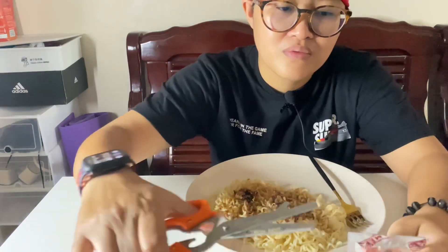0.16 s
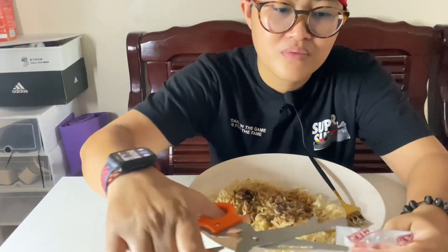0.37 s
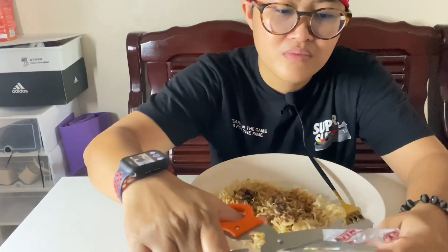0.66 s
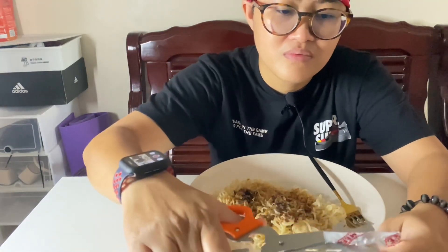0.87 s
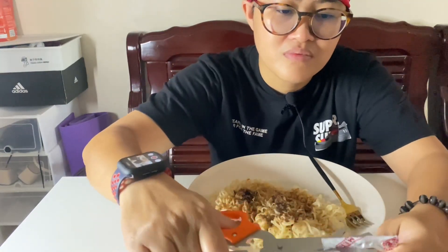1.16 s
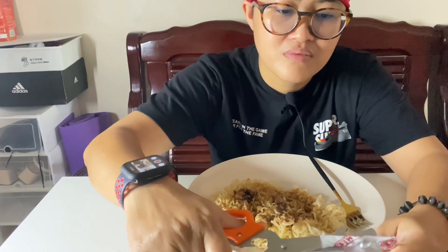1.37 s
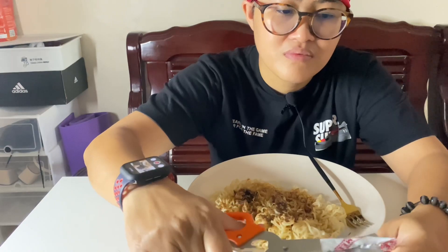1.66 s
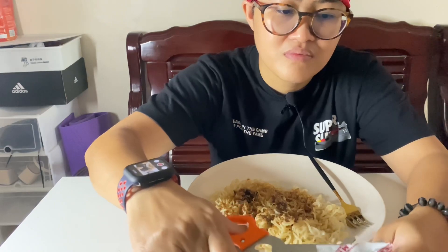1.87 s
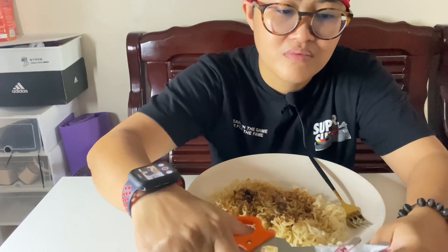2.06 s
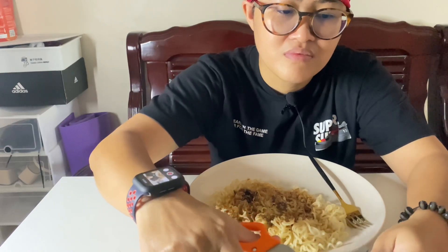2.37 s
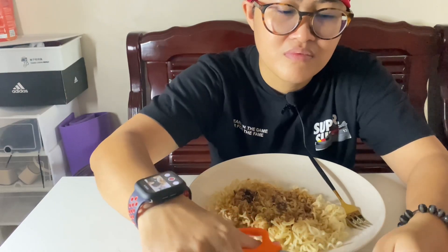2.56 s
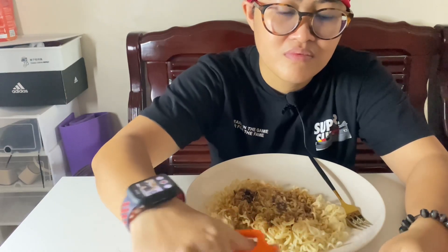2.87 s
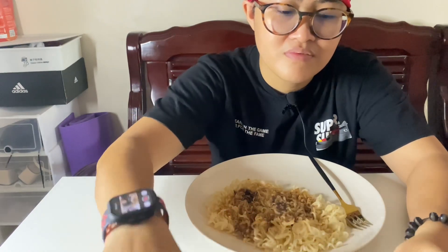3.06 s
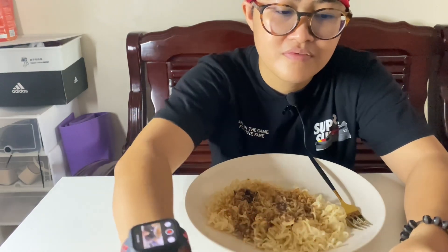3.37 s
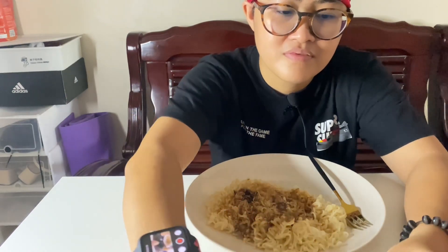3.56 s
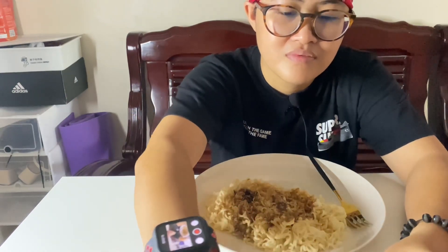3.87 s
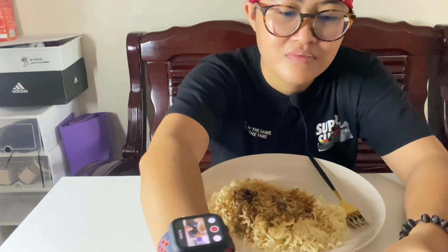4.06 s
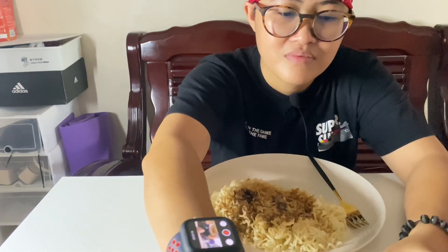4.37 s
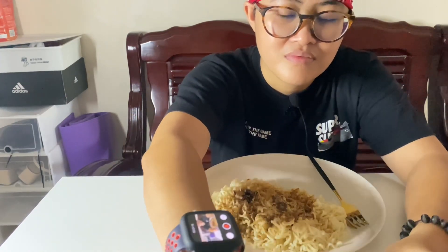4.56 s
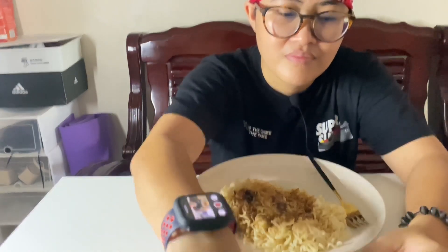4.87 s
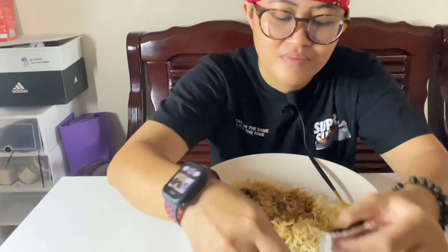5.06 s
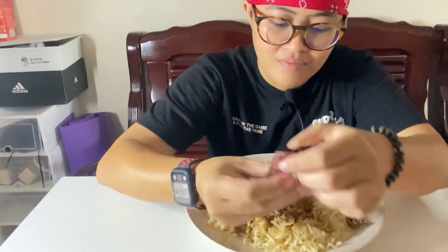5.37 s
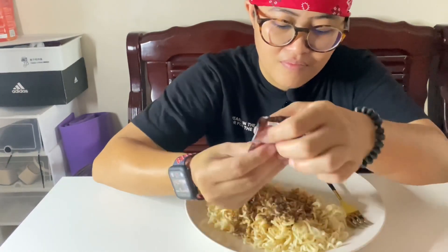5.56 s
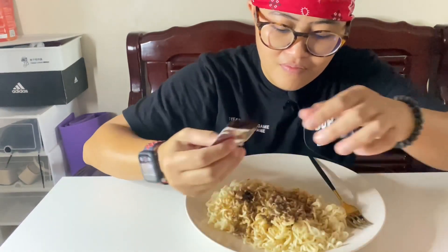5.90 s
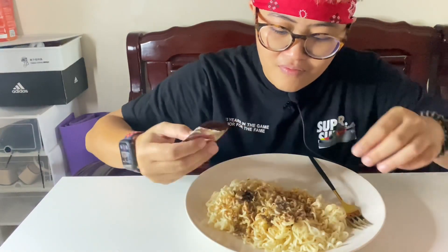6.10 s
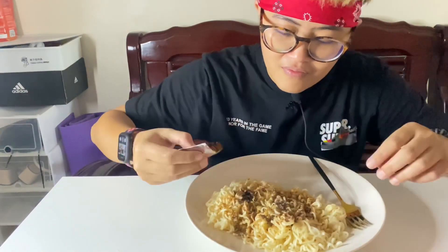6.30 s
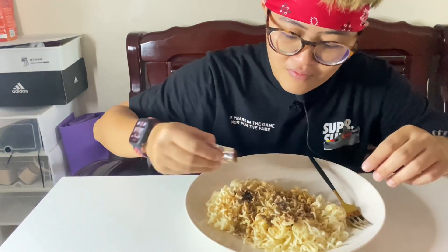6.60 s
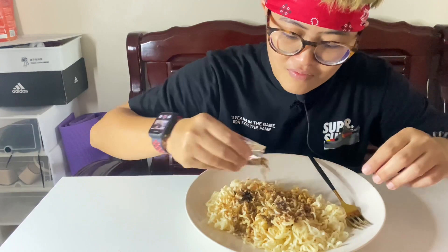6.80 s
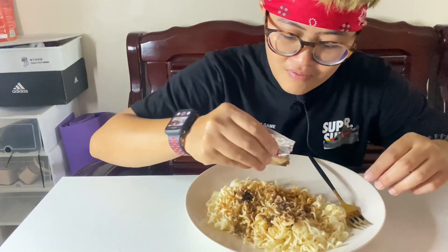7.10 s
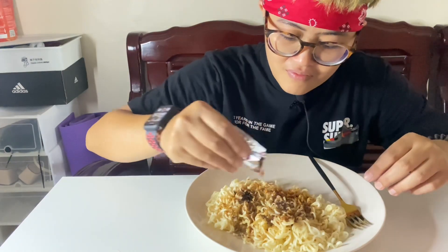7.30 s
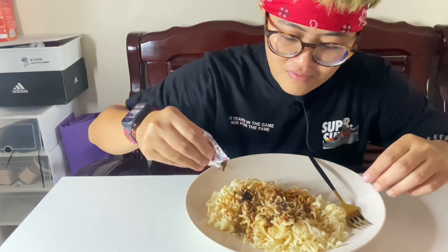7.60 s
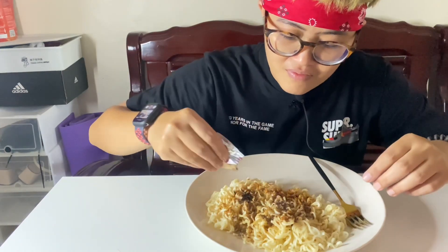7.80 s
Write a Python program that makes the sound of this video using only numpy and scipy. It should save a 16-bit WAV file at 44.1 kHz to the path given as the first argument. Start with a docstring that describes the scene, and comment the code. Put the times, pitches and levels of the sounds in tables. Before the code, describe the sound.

Close up in a small hard room, thin plastic film crackles faintly, then snaps sharply as scissors cut a sachet. The scissors are set down and slide along a table with short scrapes, then drop with a loud double-bouncing clatter. Finally the sachet is pinched open with crisp crinkles and shaken, tiny bits ticking onto a plate over low hum and soft hiss.

```python
"""A faint crackle of film comes first, as scissors snip open a small plastic sachet; they are then slid over a
table, with a few ticks, and dropped on it; last, the sachet is pinched open and crunchy bits are shaken onto a plate.
Film sounds are impulses of buckling passed through resonances; the table is a sum of decaying modes, struck
or rubbed. A small hard room adds diffuse echoes over a low hum, rumble and hiss.
The close clip-on microphone is keenest near 5 kHz."""
import sys
import numpy as np
from scipy import signal
from scipy.fft import rfft, irfft
from scipy.io import wavfile
from scipy.ndimage import uniform_filter1d

SR = 44100
rng = np.random.default_rng(int(sys.argv[2]) if len(sys.argv) > 2 else 0)


def generate_wav(signal):
    """Clip the signal to [-1, 1] and save it as 16-bit WAV at the path in sys.argv[1]."""
    frames = np.transpose(np.atleast_2d(signal))
    scaled = np.clip(frames, -1, 1) * 32767
    pcm = np.round(scaled).astype(np.int16)
    wavfile.write(sys.argv[1], SR, pcm)


N = 350330
TIME = np.arange(N) / SR  # s

# loudest snaps: film being cut, pinched and shaken, and a few ticks while the scissors are slid,
# the first likely their blades closing: (time [s], relative tick peak [dB], relative pop level [dB])
SNAPS = [(0.0276, -24.5, -48), (0.131, -29.5, -52), (0.512, -30, -57), (0.597, -28, -69),
         (0.6928, -31.5, -54), (1.0276, -18.5, -44), (1.0715, -19, -50), (1.0944, -20, -44),
         (1.2898, -20, -51), (1.3639, -17.5, -55), (1.4214, -22.5, -55), (1.477, -2, -35),
         (1.5364, -10, -53), (1.5648, -21, -49), (1.7056, -34, -35.5), (1.8212, -21.5, -45.5),
         (1.8452, -16, -42), (2.1962, -17.5, -38), (2.378, -25, -39.5), (2.5666, -25, -44.5),
         (2.6798, -6.5, -29), (2.6869, -14.5, -35), (2.7324, -23, -42), (3.9172, -17, -41.5),
         (3.9669, -26, -33), (4.1705, -27, -43.5), (5.492, -26.5, -43), (5.5445, -14, -35.5),
         (5.6725, -21, -30), (6.348, -12, -35), (6.4494, -27, -46), (6.5136, -18, -36), (6.9594, -20, -43),
         (7.199, -27.5, -50.5), (7.3063, -20, -41), (7.519, -22, -42), (7.5451, -12, -40),
         (7.5488, -12, -36.5), (7.669, -20, -52), (7.6984, -17, -58), (7.7404, -21.5, -41),
         (7.8585, -22.5, -49)]
# flurries of small crackles, mostly from a squeeze, cut or shake: (time [s], length [s], relative level [dB])
FLURRIES = [(0, 0.028, -49), (0.127, 0.078, -52.5), (0.487, 0.023, -48.5), (.655, 0.16, -62.5),
            (0.998, 0.17, -49), (1.213, 0.18, -53.5), (1.418, 0.033, -44.5), (1.493, .085, -42),
            (1.628, 0.2, -51), (1.803, 0.16, -48), (1.997, .13, -44.5), (2.188, 0.074, -47),
            (2.338, .12, -46), (2.483, 0.11, -49), (2.626, 0.052, -41.5), (2.791, .08, -45.5),
            (3.02, .26, -58.5), (3.931, .09, -52.5), (5.234, .11, -50.5), (5.375, 0.16, -52),
            (5.529, 0.12, -48.5), (5.641, .1, -42.5), (5.72, 0.27, -53), (5.945, 0.072, -44),
            (6.11, .14, -46), (6.25, 0.091, -54), (6.44, 0.22, -52.5), (6.677, 0.48, -49),
            (7.45, 0.34, -50.5)]
# colour of one buckle in the film: (frequency [Hz], gain [dB])
FILM_COLOUR = [(800, -60), (2200, -28), (3200, -5.5), (4300, -2), (5300, 11), (6100, -4), (7000, -13),
               (9000, -26.5), (12000, -45), (16000, -44.5)]
# colour of the stretched sachet behind the buckle: (frequency [Hz], gain [dB])
SACHET_COLOUR = [(200, -27), (600, 5.5), (1200, 5), (1900, 2), (2800, 6), (4000, 1), (7000, -41.5)]
# sizes of crease in the crackle: (pitch ratio [1], level [dB])
CREASE_SIZES = [(1.093, 0), (1, 0), (0.865, 0), (1.63, -24)]
# the lips of the cut sachet peel apart: (time [s], length [s], level [dB])
PEELS = [(5.448, 0.59, -55), (5.669, 0.015, -35)]
# lone ticks while the sachet rests, is cut, rests and is shaken: (time [s], level [dB])
STRAY_LEVELS = [(.9, -68), (1.05, -57), (2.9, -57), (3.3, -68), (5.1, -68), (5.4, -56)]
# scissors set down on the table, nudged, then dropped with bounces: (time [s], force [dB])
KNOCKS = [(3.6323, -19.5), (3.6631, -30.5), (3.8432, -23), (4.507, -33), (4.6367, .5), (4.663, -12.5),
          (4.8633, -2), (4.876, -5.5), (4.898, -13), (4.9025, -13), (4.9405, -21), (4.954, -15),
          (4.971, -17), (5.033, -32)]
# pushes of the scissors along the table: (time [s], length [s], relative level [dB])
SLIDES = [(3.647, 0.049, -40), (3.747, .14, -37.5), (4.102, 0.11, -41), (4.259, 0.14, -35.5),
          (4.346, 0.27, -49), (4.607, .037, -44.5)]
# modes of the table top with the scissors on it:
# (frequency [Hz], width before the damping factor [Hz], gain when struck [dB], gain when rubbed [dB])
TABLE_MODES = [(169, 81, -4, -14), (430, 25, -4, -8.5), (578, 120, -34, 7), (700, 36, 5.5, -22),
               (933, 170, 7, -29.5), (1009, 69, 3, 7), (1085, 59, 9, -6), (1322, 170, 3.5, -5),
               (1620, 174, 3.5, -8.5), (1884, 82, 8.5, -8), (2220, 150, -3.5, -31), (2440, 150, 3.5, -6),
               (2620, 43, -9, -7), (3460, 86, 4, -15.5), (4090, 370, -17.5, -13.5), (4420, 370, -6, -24.5),
               (4990, 155, -25.5, -10.5), (5010, 190, -8, -16.5)]
# reverberation: (frequency [Hz], time to fall by 60 dB [s])
REVERB_TIMES = [(300, 1), (1200, 0.39), (3000, 0.64), (5500, 0.73), (10000, 0.31)]
# spectrum of room rumble and microphone hiss: (frequency [Hz], relative density [dB])
AIR_COLOUR = [(5, -3), (13, 12), (27, -16.5), (60, -5.5), (95, -28), (150, -25), (280, -21.5), (600, -29.5),
              (1100, -35.5), (2000, -44.5), (3500, -50), (5300, -51), (7500, -63), (15000, -70.5)]

AIR_DB = -50.5  # level of the air noise, set by its 100-1000 Hz band before flutter
SACHET_BODY_DB = -7  # trim of the sachet body's level in each flurry
SWELL_SHARE = 0.36  # part of a hand move spent swelling; the rest is release
THUD_SLOPE, CLACK_SLOPE = 0.77, 1.2  # dB per dB of force: a harder blow is brighter
TOP_HZ = 16200  # upper edge of the pass band


def snaps(edge_db=-1.0, body_db=-4.5, crease_ratio=1.019, crease_scatter=0.046, own=0.89, scatter=0.31):
    """Impulsive excitation, mostly film buckling: a sharp tick, and a duller pop of randomly shifted pitch."""
    out, t = np.zeros(N), np.arange(2048) / SR
    tension = rng.uniform(-0.98, 1, (len(SNAPS), 2))
    for (s, tick_db, pop_db), (crease, stretch) in zip(SNAPS, tension):
        flip = contact(t, decay_s=.0006, rough=.9)
        # each snap's own pitch sits beside the fixed treble peak of the microphone
        own_colour = response(FILM_COLOUR, crease_ratio * np.exp(crease_scatter * crease))
        tick = through(flip, response(FILM_COLOUR) + own * own_colour)
        push = contact(t, decay_s=0.0019, rough=2.7)
        pop = through(push, response(SACHET_COLOUR, np.exp(scatter * stretch)))
        snap = at_peak(tick, tick_db + edge_db) + at_level(pop, pop_db + body_db)
        add(out, s + .0006, snap)
    return out


def crackle(edge_db=-1.5):
    """Crackling noise: countless creases of four sizes yield as the film flexes and the bits shift inside it."""
    clicks = [grains(rate=430, spread_db=4.3, bunch_db=3) for _ in CREASE_SIZES]
    edge = np.zeros(N)
    for click, (pitch, db) in zip(clicks, CREASE_SIZES):
        edge += undb(db) * through(click, response(FILM_COLOUR, pitch))
    body = through(sum(clicks), response(SACHET_COLOUR))
    return strokes(edge, FLURRIES, edge_db) + strokes(body, FLURRIES, SACHET_BODY_DB)


def peel(lo_hz=2500, hi_hz=3500):
    """Jerky peeling: the film unsticks in quick releases that ring the opening mouth of the sachet."""
    rasp = band(grains(rate=500, spread_db=4, bunch_db=3), lo_hz, hi_hz)
    return strokes(rasp, PEELS)


def stray_ticks():
    """Random buckling: lone creases tick on, more strongly while the sachet is cut or shaken."""
    ticks = unit(through(grains(rate=110, spread_db=4.5, bunch_db=2), response(FILM_COLOUR)))
    time_s, level_db = np.transpose(STRAY_LEVELS)
    return ticks * undb(np.interp(TIME, time_s, level_db))


def bits(start_s=6.75, end_s=7.9, count=36, pitch_hz=2500, scatter=0.55, ring_s=0.00073, peak_db=-42,
         spread_db=4):
    """Impact excitation: each crunchy bit lands on the plate with a short damped tick of its own pitch."""
    out, t = np.zeros(N), np.arange(1024) / SR
    for when, size, force in rng.random((count, 3)):
        hz = pitch_hz * np.exp(scatter * (2 * size - 1))
        ring = np.exp(-t / ring_s) * np.sin(2 * np.pi * hz * t)
        tick = through(contact(t, decay_s=.0004, rough=.8), ring)
        s = start_s + when * (end_s - start_s)
        add(out, s, at_peak(tick, peak_db + spread_db * (2 * force - 1)))
    return out


def knocks(ring_db=0, thud_db=-14, clack_db=-19, thud_low_hz=150, split_hz=1500):
    """Impact on a modal body: handles and loose blades bounce; harder contacts reach the higher modes."""
    out, t = np.zeros(N), np.arange(8192) / SR
    ring = table_ring(t, rubbed=False, damping=0.88, click=0.14)
    for s, force_db in KNOCKS:
        blow = through(contact(t, decay_s=.002, rough=2), ring)
        thud = at_level(band(blow, thud_low_hz, split_hz), THUD_SLOPE * force_db + thud_db)
        knock = at_peak(band(blow, split_hz, 2770), force_db + ring_db)
        clack = at_level(band(blow, 3900, 5990), CLACK_SLOPE * force_db + clack_db)
        add(out, s, thud + knock + clack)
    return out


def slide(rub_db=-1, scratch_db=-14):
    """Stick-slip friction: the scissors slip in small jerks that keep the table's modes ringing."""
    ring = table_ring(np.arange(4096) / SR, rubbed=True, damping=.55, click=.02)
    slips = through(grains(rate=900, spread_db=3, bunch_db=3), ring)
    rub = band(slips, 220, 3200)
    scratch = band(band(slips, 3400, 6500), 3400, 6500)  # twice, for steeper edges
    return strokes(rub, SLIDES, rub_db) + strokes(scratch, SLIDES, scratch_db)


def table_ring(t, rubbed, damping, click):
    """Modal superposition: one push excites decaying modes and a bare click; rubbing weights them differently."""
    out = click * (t == 0)
    for hz, width, struck_db, rubbed_db in TABLE_MODES:
        size = undb(rubbed_db if rubbed else struck_db) * 2 * np.pi * width / SR
        decay = np.exp(-np.pi * damping * width * t)
        out = out + size * decay * np.cos(2 * np.pi * hz * t)
    return out


def hinge(s=.125, length_s=0.059, start_hz=1350, end_hz=1130, db=-54):
    """Frequency modulation: the pivot gives a faint, unsteady falling squeak as the blades open."""
    glide = np.interp(TIME, [s, s + length_s], [start_hz, end_hz])
    hz = glide * (1 + .04 * walk(300))
    squeak = np.sin(2 * np.pi * np.cumsum(hz) / SR)
    return strokes(squeak, [(s, length_s, db)])


def room(x, gap_s=0.00099, build_s=0.001):
    """Diffuse reverberation: echoes from near walls decay exponentially at a rate set by frequency."""
    t = np.arange(int(.8 * SR)) / SR
    edges = np.geomspace(150, 16000, 9)  # Hz
    tail = np.zeros(len(t))
    for lo, hi in zip(edges, edges[1:]):
        t60 = on_log_axis(REVERB_TIMES, np.sqrt(lo * hi))
        tail += band(rng.standard_normal(len(t)), lo, hi) * np.exp(-np.log(1000) * t / t60)
    tail = tail * np.clip((t - gap_s) / build_s, 0, 1)
    return through(x, tail / np.linalg.norm(tail))


def background(air_db=0, hum_db=-46.0, waver=0.161, flutter_db=1):
    """Shaped noise and a modulated sinusoid: rumble and hiss with fluttering mids, and a wavering mains hum."""
    colour = undb(on_log_axis(AIR_COLOUR, np.fft.rfftfreq(N, 1 / SR)))
    air = irfft(rfft(rng.standard_normal(N)) * colour, N)
    middle = band(air, 100, 1000)
    flutter = middle * (undb(flutter_db * walk(13)) - 1)
    air = (air + flutter) / np.std(middle)
    phase = 2 * np.pi * 50 * TIME  # 50 Hz
    hum = (1 + waver * walk(25)) * np.sin(phase) + waver * walk(4.1) * np.cos(phase)
    return air * undb(AIR_DB + air_db) + unit(hum) * undb(hum_db)


def contact(t, decay_s, rough):
    """Contact force: a sharp push, with a random chatter that swells and dies."""
    chatter = rng.standard_normal(len(t)) * np.sqrt(t) * np.exp(-t / decay_s)
    return (t == 0) + rough * chatter / np.linalg.norm(chatter)


def grains(rate, spread_db, bunch_db):
    """Random impulse process: tiny clicks, mostly weak, at rate per second, with bunches of stronger ones."""
    size = undb(spread_db * np.minimum(rng.exponential(size=N), 3.5))
    sign = rng.choice([-1, 1], N)
    happens = rng.random(N) < rate / SR
    return happens * sign * size * undb(bunch_db * walk(150))


def walk(rate):
    """Low-pass randomness: smoothed held steps of unit rms, renewed rate times a second."""
    k = int(SR / rate)
    held = np.repeat(rng.standard_normal(N // k + 1), k)[:N]
    return unit(uniform_filter1d(uniform_filter1d(held, k), k))


def stroke(texture, s, length_s, db):
    """Amplitude envelope: a stretch of texture swells and fades with one hand move, at rms db."""
    piece = texture[int(s * SR):][:int(length_s * SR)]
    progress = np.interp(np.linspace(0, 1, len(piece)), [0, SWELL_SHARE, 1], [0, .5, 1])
    return unit(piece * np.sin(np.pi * progress)) * undb(db)


def strokes(texture, moves, trim_db=0):
    """Superposition: enveloped stretches of one texture are placed at the times of the moves."""
    out = np.zeros(N)
    for s, length_s, db in moves:
        add(out, s, stroke(texture, s, length_s, db + trim_db))
    return out


def response(points, stretch=1, size=512):
    """Minimum phase: a (Hz, dB) colour, its pitch multiplied by stretch, becomes a causal impulse response."""
    hz = np.fft.rfftfreq(size, 1 / SR) / stretch
    cepstrum = irfft(np.log(undb(on_log_axis(points, hz))))
    cepstrum[1:size // 2] *= 2  # fold the cepstrum onto positive time
    cepstrum[size // 2 + 1:] = 0
    return irfft(np.exp(rfft(cepstrum)))


def through(x, ring):
    """Linear convolution: x excites an impulse response."""
    return signal.fftconvolve(x, ring)[:len(x)]


def band(x, lo_hz, hi_hz):
    """Band-pass filtering: keep lo_hz to hi_hz."""
    return signal.sosfilt(signal.butter(3, [lo_hz, hi_hz], "band", fs=SR, output="sos"), x)


def on_log_axis(points, hz):
    """Logarithmic frequency scale: interpolate (Hz, value) points at any frequency."""
    f, value = np.transpose(points)
    return np.interp(np.log(np.maximum(hz, 1)), np.log(f), value)


def undb(db):
    """Decibel law: level to amplitude ratio."""
    return 10 ** (np.asarray(db) / 20)


def unit(x):
    """Root mean square: scale to rms 1."""
    return x / np.sqrt(np.mean(x ** 2))


def at_peak(x, db):
    """Peak level: set the highest swing of a hit."""
    return x * undb(db) / np.abs(x).max()


def at_level(x, db):
    """Short-time level: set the rms of the first 12 ms of a hit."""
    return x * undb(db) / np.sqrt(np.mean(x[:int(.012 * SR)] ** 2))


def add(track, s, sound):
    """Superposition: mix a sound in at time s."""
    i = int(s * SR)
    track[i:i + len(sound)] += sound[:N - i]


def scene():
    """Direct and reverberant field: the near sachet wakes the room less than the table further off."""
    sachet = snaps() + crackle() + peel() + stray_ticks() + bits()
    scissors = knocks() + slide() + hinge()
    echo = room(undb(-15) * sachet + undb(-8.5) * scissors)
    return (sachet + scissors + echo + background())[None]


def record(dry):
    """Overload and band limiting: the input clips at full scale, then a low-pass cuts the top."""
    low_pass = signal.ellip(8, .2, 70, TOP_HZ, fs=SR, output="sos")
    return signal.sosfilt(low_pass, np.clip(dry, -1, 1))


dry = scene()
out = record(dry)
generate_wav(out)
```